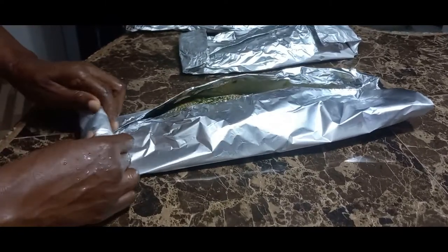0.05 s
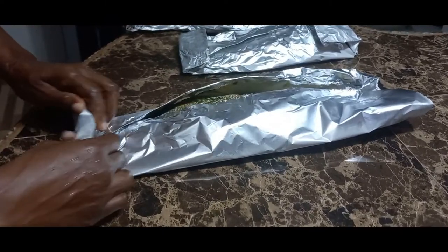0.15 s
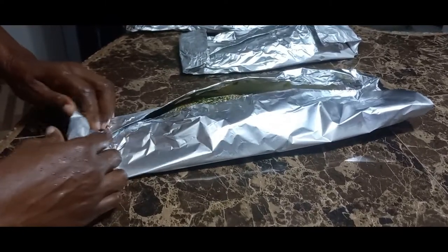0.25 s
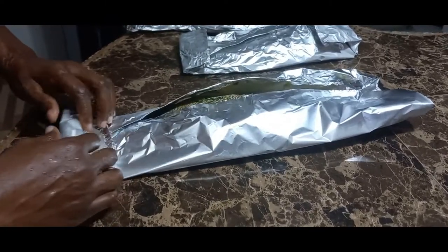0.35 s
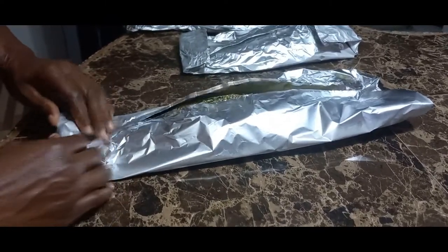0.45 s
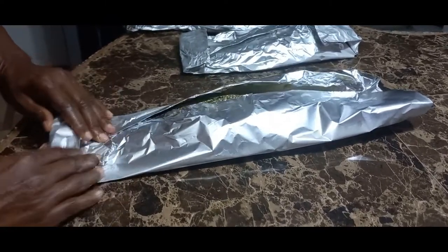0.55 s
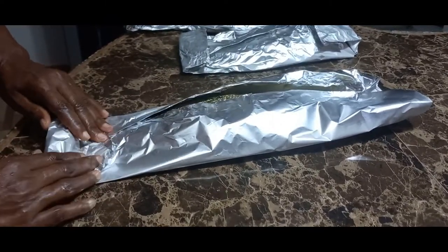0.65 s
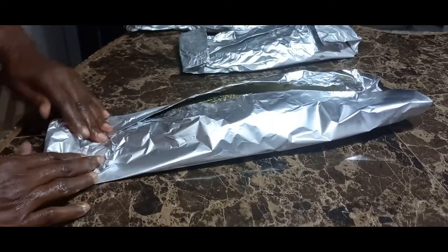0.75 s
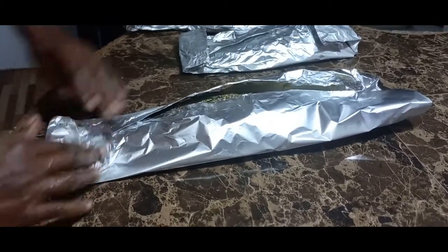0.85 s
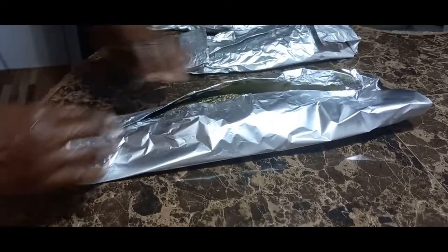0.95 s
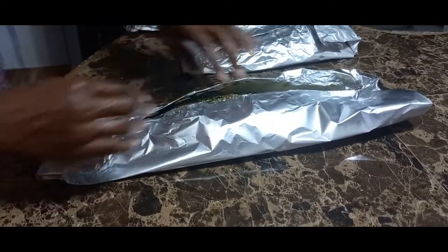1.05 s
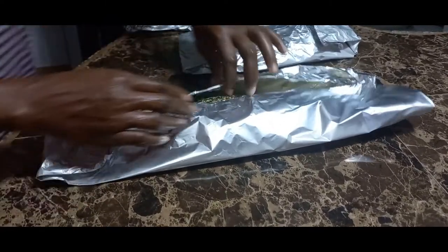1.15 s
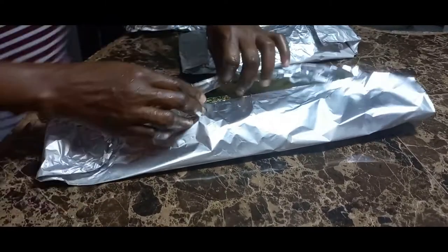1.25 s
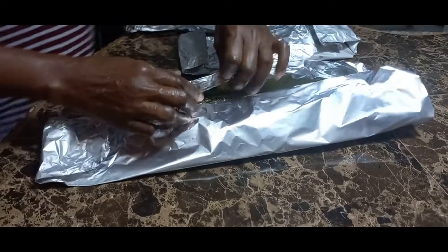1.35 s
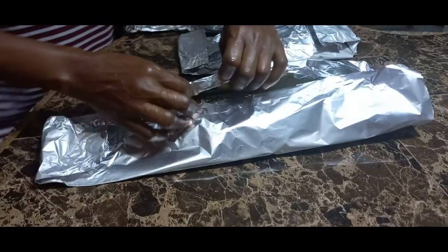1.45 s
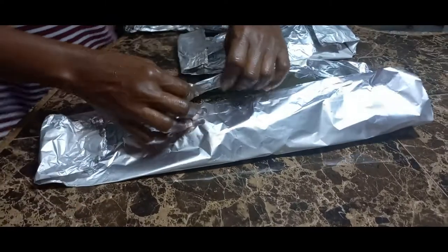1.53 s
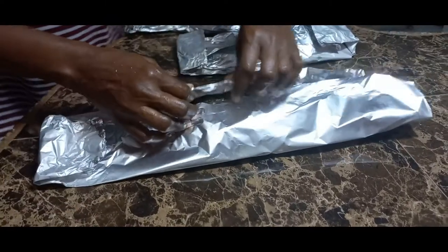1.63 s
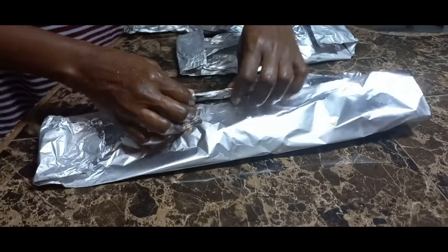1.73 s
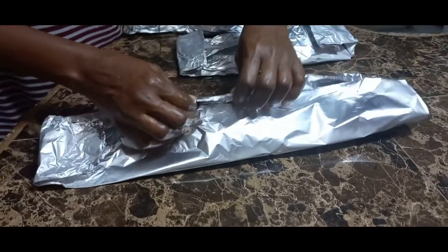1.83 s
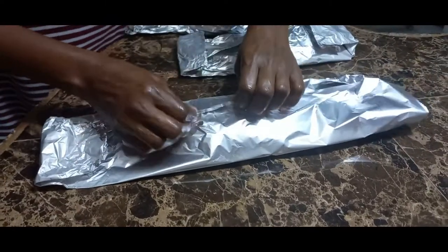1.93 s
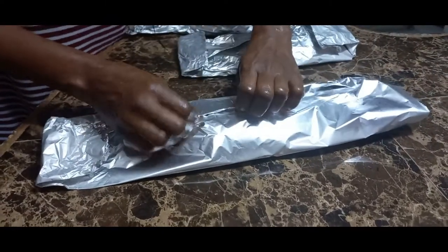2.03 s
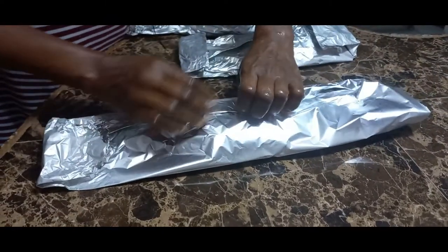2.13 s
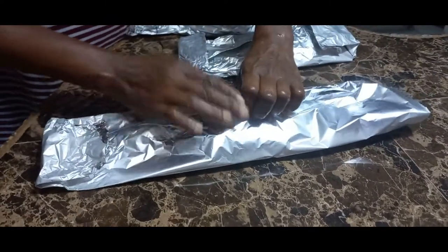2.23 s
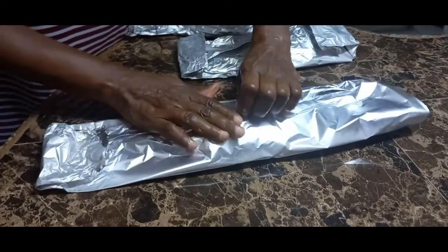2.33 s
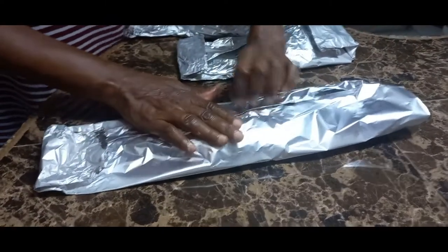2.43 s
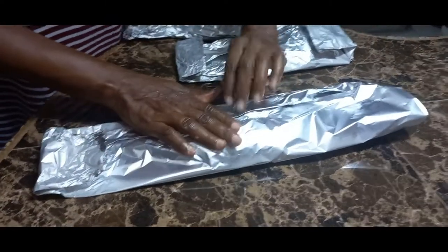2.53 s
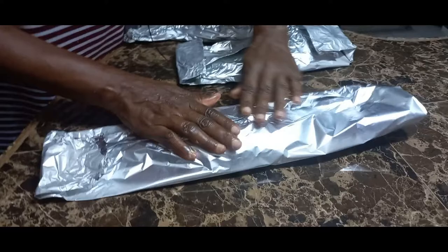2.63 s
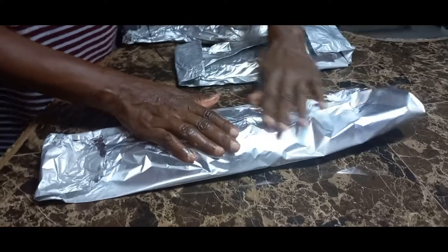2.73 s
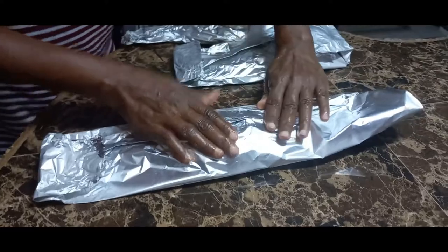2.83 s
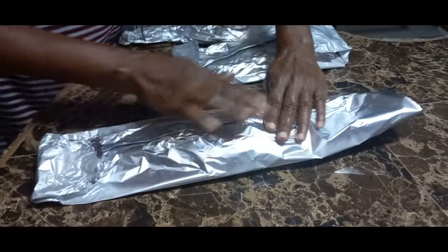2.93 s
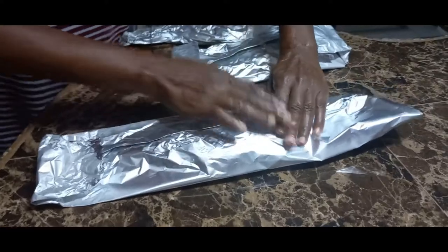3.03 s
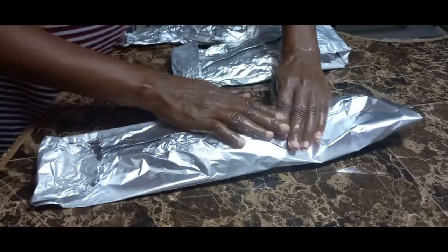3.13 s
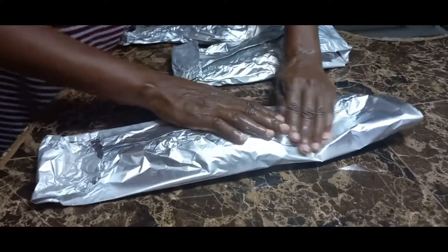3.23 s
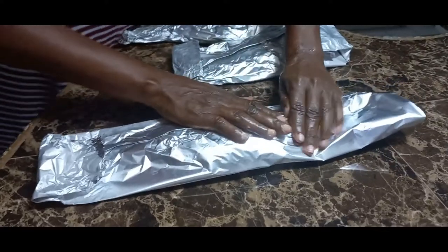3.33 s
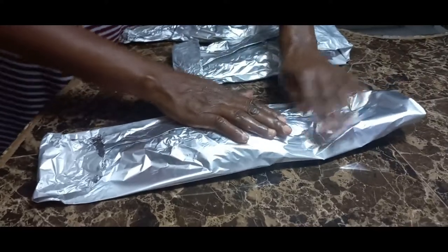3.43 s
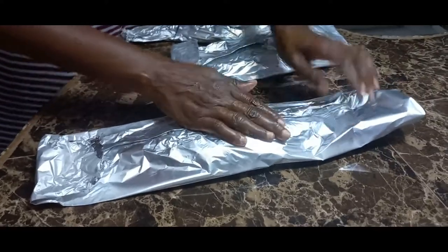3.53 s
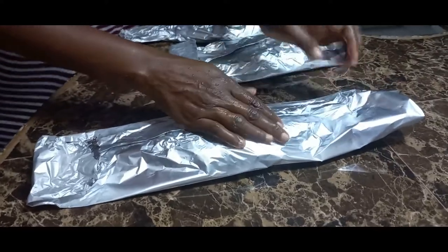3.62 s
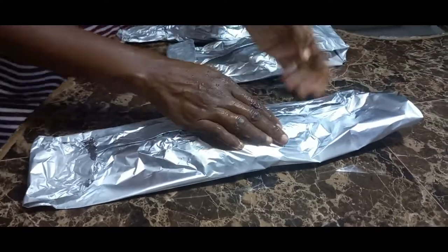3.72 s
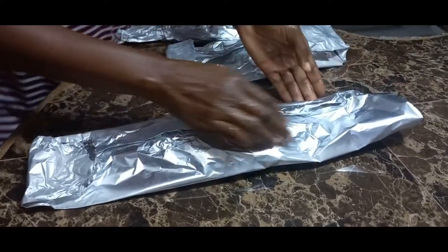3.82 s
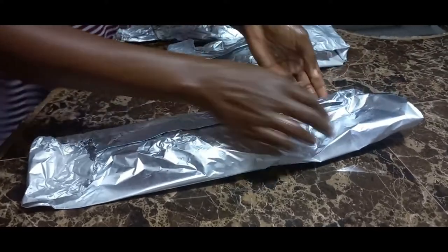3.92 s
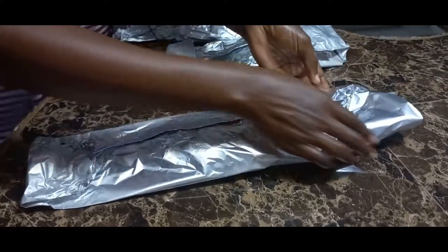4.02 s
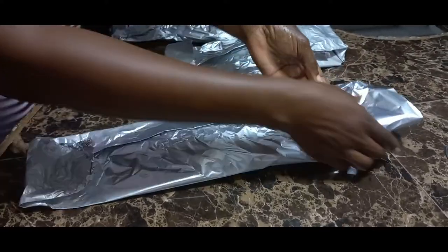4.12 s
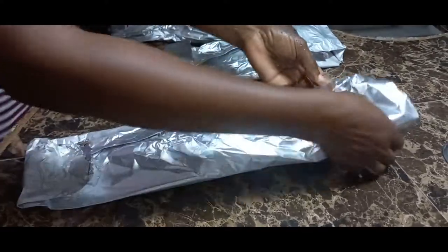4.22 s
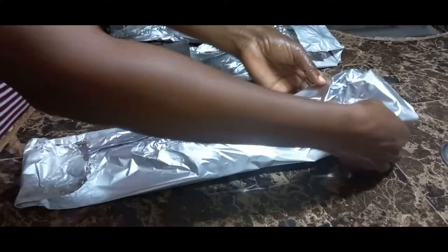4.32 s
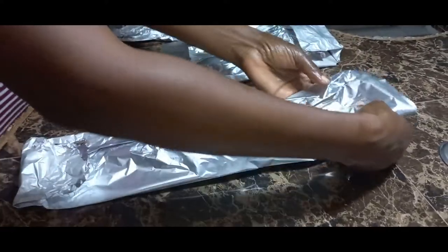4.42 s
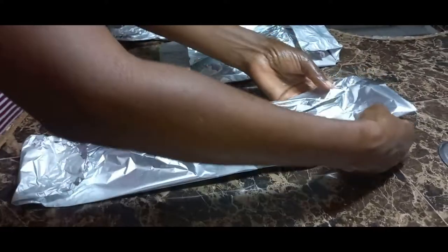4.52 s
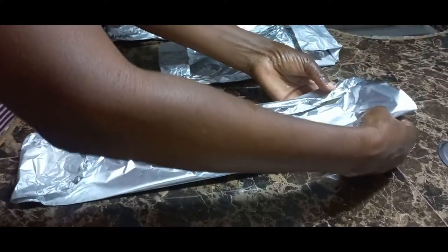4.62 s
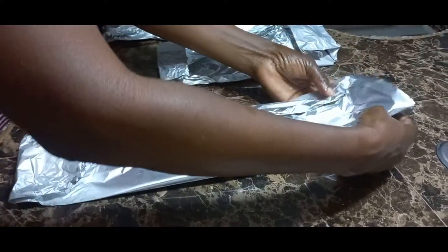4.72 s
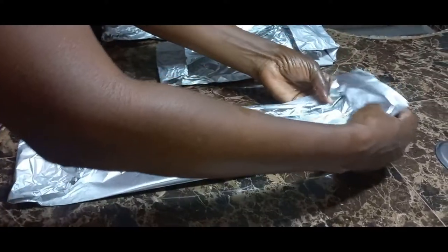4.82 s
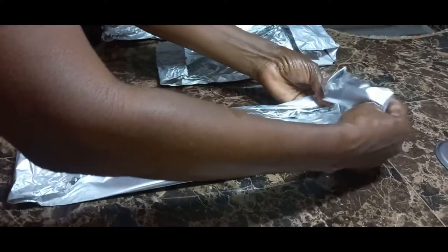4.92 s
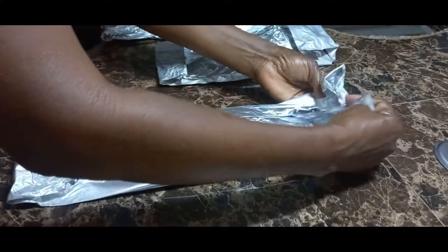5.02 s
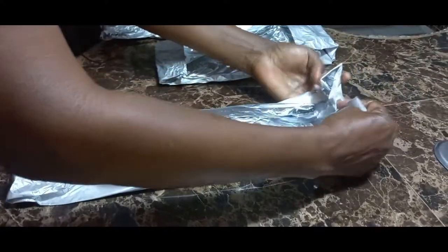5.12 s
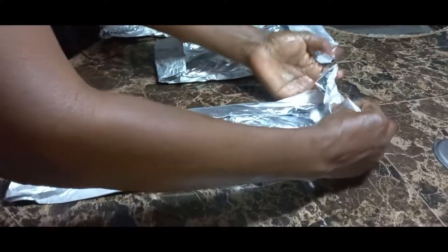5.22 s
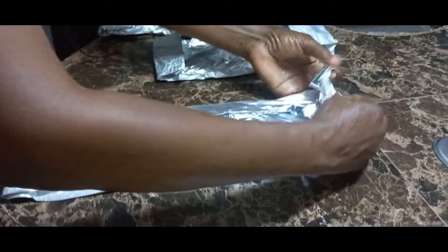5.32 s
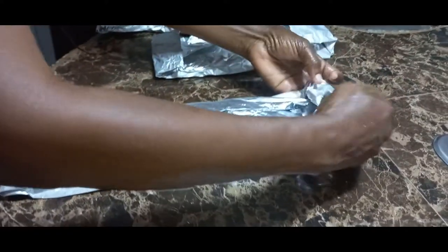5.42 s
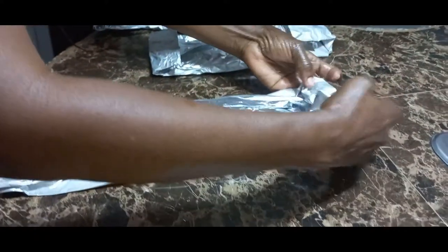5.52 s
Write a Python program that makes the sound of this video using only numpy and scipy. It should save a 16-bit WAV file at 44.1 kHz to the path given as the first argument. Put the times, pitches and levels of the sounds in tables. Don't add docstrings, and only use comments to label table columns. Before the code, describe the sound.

Aluminium foil crackles and crinkles close up as hands fold, crimp and press it on a stone counter, with a faint hum behind.

```python
import sys
import numpy as np
from scipy import signal
from scipy.fft import rfft, irfft, next_fast_len
from scipy.io import wavfile
from scipy.ndimage import uniform_filter1d

SR = 44100
rng = np.random.default_rng(int(sys.argv[2]) if len(sys.argv) > 2 else 0)


def gain_from_db(level_db):
    decades = np.asarray(level_db, float) / 20
    return 10 ** decades


def bounce(signal):
    frames = np.transpose(np.atleast_2d(signal))
    limited = np.clip(frames, -1, 1)
    pcm = np.round(limited * 32767).astype(np.int16)
    wavfile.write(sys.argv[1], SR, pcm)


N = 245195

# start in seconds, length in seconds, top effort in dB,
# swell over the stroke in dB, wide panels in dB re fine creases.
FOLD_STROKES = [
    (-0.01, 0.063, -40, -19, -9.5),
    (-0.01, 0.25, -57.0, -3.7, -23),
    (0.13, 0.098, -64.4, 4, -24.6),
    (0.245, 0.45, -49.2, 15, -17.4),
    (0.35, 0.06, -52, -10, -28.3),
    (0.5, 0.35, -56.5, -16.5, -14),
    (0.6, 0.06, -51.8, 13.0, -22),
    (0.8, 0.06, -75.2, -13.3, -12.6),
    (0.849, 0.13, -55.5, 18, -24.0),
    (0.877, 0.077, -60.5, -9, -15),
]
CRIMP_STROKES = [
    (1.18, 0.32, -45.5, 9, -7),
    (1.28, 0.13, -46.1, 8, -7),
    (1.53, 0.41, -45.5, 14, -14.1),
    (1.54, 0.2, -45.7, -14, -8.1),
    (1.88, 0.06, -41.5, -6.1, -15),
    (1.96, 0.22, -46.0, -5.0, -15.0),
    (2.11, 0.35, -56.5, 11, -11.6),
]
PRESS_STROKES = [(2.26, 0.091, -53, 5, -18), (2.29, 0.059, -38, 20, -14.5),
                 (2.38, 0.18, -43.5, -18.5, -14.8), (2.49, 0.046, -53.3, 1, -19),
                 (2.56, 0.13, -58.5, 4, -27), (2.61, 0.25, -54.7, 3.5, -17.5), (2.76, 0.18, -54, -6.5, -13),
                 (2.79, 0.13, -42.5, -8.5, -10), (2.82, 0.4, -47.5, 17, -8), (3.01, 0.25, -51, -6.7, -13.5),
                 (3.08, 0.085, -55.5, 1, -7.5), (3.26, 0.05, -46.5, -0.1, -3.5),
                 (3.28, 0.43, -49, -16, -11), (3.47, 0.063, -48.5, 17.5, -6), (3.77, 0.09, -65.6, 17, -19)]
ROLL_STROKES = [(3.89, 0.084, -55, -15, -27), (3.93, 0.45, -44.5, 18.8, -14.5),
                (4.01, 0.095, -44.5, -11, -10.5), (4.21, 0.095, -43.5, 6.2, -9),
                (4.36, 0.18, -37.5, 18, -13.2), (4.49, 0.45, -42.5, 7.9, -13),
                (4.56, 0.04, -49, 0.3, -23.2), (4.75, 0.099, -42, 2, -12.5),
                (4.95, 0.093, -41.5, -1.5, -12.5), (5.07, 0.45, -49.5, -5, -10.5),
                (5.14, 0.022, -48.5, 2, -9.5), (5.23, 0.056, -46.5, -16, -7), (5.4, 0.097, -48, -13, -8),
                (5.45, 0.26, -41, -13.4, -8.5)]
# time in seconds, length in seconds, change of the swarm in dB.
PAUSES = [(0.282, 0.03, -7.7), (0.318, 0.04, -7), (0.336, 0.012, -6), (0.479, 0.023, -7), (0.529, 0.028, 5),
          (0.608, 0.015, -4.0), (0.691, 0.015, -7), (0.74, 0.03, -2.9), (1.242, 0.027, -3.5),
          (1.467, 0.05, -8), (1.602, 0.018, -7), (1.628, 0.025, -6.5), (1.72, 0.03, -3),
          (1.746, 0.038, -8.9), (1.851, 0.02, -6), (1.869, 0.012, -4.0), (2.23, 0.033, -2),
          (2.46, 0.03, -4.6), (2.616, 0.01, -5), (2.671, 0.03, 7.5), (2.734, 0.025, -8), (2.99, 0.023, -3),
          (3.085, 0.015, -3), (3.21, 0.03, -5.0), (3.601, 0.034, 5.9), (3.782, 0.03, 5),
          (3.88, 0.012, -4.0), (3.96, 0.03, 6), (3.99, 0.03, -4.6), (4.12, 0.02, -6), (4.198, 0.02, -6.4),
          (4.41, 0.03, -3.0), (4.69, 0.039, -6.5), (5.08, 0.021, -3), (5.28, 0.03, -4.5), (5.287, 0.01, -5)]
# time in seconds, peak in dB, top fizz in dB re peak.
FOLD_CRACKS = [(0.0316, -36.8, -16.5), (0.1356, -42, -11.5), (0.1645, -43.5, -19.1), (0.2957, -41.7, -15.0),
               (0.3461, -41, -11), (0.3581, -36.5, -11.7), (0.4199, -41.1, -14.5), (0.4534, -41.0, -12.8),
               (0.5072, -40.7, -11.3), (0.6155, -33.5, -23.1), (0.6479, -39.1, -12.1),
               (0.6584, -35.2, -18.6), (0.6999, -33.5, -11), (0.8764, -43.5, -13), (0.9053, -43.5, -22.2),
               (0.928, -50.0, -6.5), (0.9572, -38.5, -9)]
CRIMP_CRACKS = [(1.1887, -43, -14), (1.3924, -38.5, -12.5), (1.422, -35.5, -11), (1.495, -39.8, -10.1),
                (1.5694, -34, -13.7), (1.6129, -34.5, -13), (1.6482, -45, -2.1), (1.6744, -38.5, -10.6),
                (1.7015, -35, -12.0), (1.7704, -37.7, -9), (1.7848, -33, -13), (1.8564, -36.9, -11),
                (1.8786, -31, -10), (1.917, -26.5, -15), (1.9854, -40, -7.9), (2.0083, -36, -15.5),
                (2.1041, -40, -5)]
PRESS_CRACKS = [(2.2672, -47.5, 6), (2.2964, -37.6, -17), (2.3341, -25, -15), (2.5038, -33.6, -8.5),
                (2.5401, -37.5, -6.5), (2.6232, -40.5, -11.3), (2.7092, -42.5, -8.9), (2.7966, -32, -20),
                (2.8494, -34, -18.4), (2.9033, -39.3, -15), (3.0036, -44.9, -10), (3.0235, -32.5, -15.4),
                (3.0934, -32, -21), (3.128, -31, -10.5), (3.1724, -38.9, -12.4), (3.2191, -42, -7.2),
                (3.2245, -39, -6.0), (3.2644, -37, -16.3), (3.355, -39.4, -18.4), (3.449, -44.5, -7),
                (3.6664, -48.0, -5.8), (3.6955, -45.0, -17), (3.728, -50.0, 0.4), (3.8302, -51.5, -11),
                (3.8538, -49.5, -8)]
ROLL_CRACKS = [(3.8891, -42.5, -6.5), (4.0183, -38, -20.1), (4.0644, -39, -13.8), (4.1375, -37, -15.0),
               (4.2188, -35.5, -14.2), (4.2887, -38, -9), (4.3685, -37, -13), (4.4593, -34, -13),
               (4.4874, -34, -15.5), (4.4984, -28.7, -16), (4.6524, -35.5, -20), (4.7072, -37, -12.6),
               (4.8252, -31, -9.2), (5.1479, -35, -9.8), (5.2322, -38.5, -11.8), (5.2936, -32, -12.7),
               (5.3946, -38.5, -11), (5.452, -35.2, -11.3), (5.4994, -35, -15.9)]
# time in seconds, peak in dB, pitch in Hz, ring T60 in seconds.
PINGS = [(0.2977, -42.5, 1880, 0.02), (0.3471, -40, 1860, 0.034), (0.4529, -42.5, 1930, 0.035),
         (0.7013, -35, 1827, 0.026), (0.8764, -48, 2060, 0.032), (1.1927, -43, 1730, 0.027),
         (1.5713, -34, 1250, 0.03), (1.7654, -46.5, 1584, 0.048), (1.8836, -28.5, 2080, 0.024),
         (1.9165, -43, 2000, 0.039), (2.0123, -34, 2016, 0.031), (2.3351, -25, 2120, 0.022),
         (2.5047, -32, 1846, 0.031), (2.6484, -39, 1905, 0.035), (2.9103, -31.5, 2223, 0.028),
         (3.2286, -42, 2420, 0.046), (4.0163, -43, 1900, 0.038), (4.1739, -41.5, 1690, 0.032),
         (4.2068, -43, 1820, 0.045), (4.2537, -41, 2020, 0.043), (4.2882, -40, 1860, 0.041),
         (4.4278, -41, 2180, 0.041), (4.4852, -39, 2320, 0.04), (4.5047, -34, 2070, 0.042),
         (4.783, -41, 1920, 0.046), (4.8339, -39, 1800, 0.032), (5.0365, -42, 2100, 0.032),
         (5.2964, -41, 2240, 0.029), (5.3438, -40, 1890, 0.032), (5.4515, -43, 1980, 0.031)]
# time in seconds, peak in dB, pitch in Hz.
MIDDLE_POPS = [(0.1361, -54, 1760), (0.174, -52, 2080), (0.249, -50, 1900), (0.362, -44, 1880),
               (0.381, -45, 1910), (0.414, -50, 2070), (0.5187, -48, 1860), (0.6305, -48, 1860),
               (0.6684, -43, 1860), (0.9043, -52, 2310), (1.266, -52, 1830), (1.3508, -41, 1920),
               (1.3987, -43, 2230), (1.4222, -42, 1910), (1.4611, -39, 2000), (1.498, -46.5, 1980),
               (1.5249, -43, 1950), (1.5713, -40, 2080), (1.6282, -47, 1970), (1.6566, -45, 2010),
               (1.7065, -42, 2020), (1.8073, -45.5, 1910), (1.8567, -46, 1980), (2.1151, -49, 1740),
               (2.3935, -47, 2090), (2.5436, -46, 2230), (2.6264, -48, 1880), (2.6644, -45, 2060),
               (2.7641, -49, 1886), (2.8734, -45, 1760), (3.03, -49, 2120), (3.05, -46, 2040),
               (3.0944, -42, 2020), (3.1527, -42, 2100), (3.2665, -42, 1820), (3.2844, -43, 2200),
               (3.3044, -44, 2190), (3.3583, -46, 1920), (3.4535, -50, 1860), (3.484, -50, 2060),
               (3.5249, -47, 2030), (3.9764, -50, 1980), (4.0487, -45, 1950), (4.136, -49, 2350),
               (4.2198, -43, 1860), (4.2694, -41, 1990), (4.3094, -44, 1860), (4.357, -43, 1750),
               (4.6543, -47, 1610), (4.7072, -48, 1860), (4.7616, -41, 2160), (4.8778, -41, 1880),
               (4.9576, -42, 1990), (5.1337, -46, 1920), (5.244, -46, 2030), (5.3931, -47, 2050),
               (5.4276, -43, 2010), (5.5094, -46, 2010)]
# time in seconds, peak in dB, pitch in Hz.
PANEL_POPS = [(1.189, -52, 1250), (1.283, -51, 1260), (1.331, -48, 1136), (1.503, -50, 1300),
              (1.584, -53, 1030), (1.834, -49, 1270), (1.881, -52, 830), (2.329, -50, 1275),
              (2.8, -48, 1220), (3.113, -52, 1190), (3.234, -53, 1140), (3.525, -53, 1030),
              (3.97, -55, 1200), (4.019, -45, 1290), (4.06, -50, 1200), (4.286, -46, 1144),
              (4.373, -49, 1110), (4.499, -42, 1294), (4.54, -47, 1370), (4.784, -46, 1270),
              (5.031, -49, 1130), (5.226, -49, 1150), (5.46, -46, 1055), (5.507, -46, 1260)]
# time in seconds, peak in dB, pitch in Hz.
LOW_POPS = [(1.189, -58, 756), (1.237, -60, 945), (1.295, -57, 754), (1.333, -55, 942), (1.364, -57, 883),
            (1.409, -62, 941), (1.57, -53, 940), (1.584, -49, 786), (1.701, -65, 860), (1.88, -54, 821),
            (1.929, -51, 850), (3.276, -57, 910), (3.293, -54, 920), (4.252, -53, 834), (4.509, -54, 732),
            (4.879, -50, 925)]
# time in seconds, peak in dB, centre of the pitch region in Hz.
FLICKS = [(0.0864, -43, 6230), (0.1655, -41, 6900), (0.2234, -46, 3700), (0.2492, -46, 4500),
          (0.3764, -43, 4490), (0.4848, -43, 4880), (0.5154, -38, 11300), (0.5764, -41, 5830),
          (0.6304, -36, 11800), (0.6743, -36, 4080), (1.2664, -43, 12900), (1.2914, -40, 3990),
          (1.3514, -36, 5800), (1.3784, -39, 5780), (1.434, -38, 11000), (1.4424, -35, 4390),
          (1.521, -39, 12500), (1.6587, -37, 5220), (1.747, -36, 4060), (1.8354, -34, 11500),
          (1.9434, -31, 5780), (2.0537, -35, 12300), (2.0747, -35, 5810), (2.1184, -37, 5650),
          (2.1774, -40, 12700), (2.6654, -44, 7660), (2.7462, -45, 5600), (2.7644, -44, 5870),
          (2.7742, -36, 3630), (2.806, -33, 11800), (3.076, -40, 3000), (3.112, -41, 4800),
          (3.3947, -39.5, 3810), (3.4311, -41, 12000), (3.4924, -45, 4020), (3.5194, -42, 5890),
          (3.9604, -47, 5420), (4.2114, -37, 5840), (4.7554, -31, 11800), (4.7844, -30.5, 4500),
          (4.962, -36, 3900), (4.975, -35, 3500), (5.0384, -33, 4420), (5.165, -33, 4300),
          (5.3727, -39, 4230), (5.4578, -29, 3820)]
# time in seconds, length in seconds, pitch in Hz, width in Hz, level in dB.
SETTLING = [
    (0.8, 0.06, 2120, 300, -70.5),
    (1.085, 0.074, 2080, 200, -88),
    (1.105, 0.097, 9200, 398, -80),
    (3.678, 0.075, 2060, 350, -70),
    (3.798, 0.27, 2000, 350, -71.5),
    (0.14, 0.12, 1930, 350, -66),
]
# frequency in Hz, spectrum level in dB.
FOIL_COLOUR = [(250, -35), (420, -22), (726, -7), (1160, -1.5), (1460, -5), (1950, 2.5), (2810, -7),
               (3300, -3), (4240, -1.5), (4710, -4.5), (5830, -3.5), (10200, -9.5), (12500, -1.5),
               (15900, -9.5)]
# frequency in Hz, spectrum level in dB.
COUNTER_COLOUR = [(30, -37), (48, 6), (100, 1), (200, 6.5), (320, 5), (450, -39)]
# time in seconds, left-right level difference in dB.
HAND_BALANCE = [
    (0.0, -1.0),
    (0.26, -3.5),
    (1.22, -1),
    (1.61, -3.5),
    (1.86, -2),
    (3.19, -3),
    (3.47, -2),
    (3.73, -5.5),
    (4.07, -2.5),
    (5.56, -1.5),
]
# time in seconds, lag of the left port in samples.
LEFT_LAG = [
    (0.0, -7),
    (2.2, -6),
    (2.7, 1),
    (5.56, 2),
]
# frequency in Hz, T60 in seconds.
ROOM_T60 = [(500, 0.14), (1320, 0.11), (2000, 0.22), (2900, 0.18), (4200, 0.25), (9190, 0.18)]
# frequency in Hz, spectrum level in dB.
AIR_COLOUR = [(26, -38), (45, -5), (207, 0), (321, -7.5), (363, -7.5), (552, -7.5), (609, -10.5),
              (1150, -27), (2130, -31), (3660, -43), (9090, -14.5), (16000, -41)]
# centre in Hz, width in Hz, level in dB.
HUM_BANDS = [
    (104, 33, -83.5),
    (253, 18, -91),
]
# frequency in Hz, left-right likeness from -1 to 1.
PORT_LIKENESS = [(60, 0.65), (130, 0.72), (290, 0.78), (640, 0.77), (1410, 0.32), (3100, 0.13),
                 (6820, -0.25), (15000, 0.13)]
# frequency in Hz, left-right level difference in dB.
PORT_BALANCE = [(60, 6.5), (110, 3), (200, -1), (380, 1.5), (700, -1.5), (1290, -1), (2380, -1.5),
                (4400, 3.5), (8120, 1), (15000, -1.5)]


def crinkle(snaps_per_s=2400, spread_db=3.0, clump_db=1.75, clumps_per_s=30, level_db=-0.74):
    snaps = gain_from_db(spread_db * np.minimum(rng.exponential(1, N), 2.3))
    snaps = snaps * (rng.random(N) < snaps_per_s / SR) * rng.choice([-1, 1], N)
    snaps = snaps * gain_from_db(clump_db * drift(clumps_per_s))
    creases = 24
    crease = rng.integers(0, creases, N)
    t60 = np.geomspace(.006, .03, num=creases)
    shapes = irfft(rings(t60, rise=0.00014, patch_db=5.5, snap_db=-0.5))[..., :1024]
    shapes = shapes / np.linalg.norm(shapes, axis=(0, 2), keepdims=True)
    swarm = np.zeros((2, N))
    for k in range(creases):
        own_snaps = (snaps * (crease == k))[None]
        swarm += signal.oaconvolve(own_snaps, shapes[:, k], axes=1)[:, :N]

    size = next_fast_len(N)
    hz = np.fft.rfftfreq(size, 1 / SR)
    spectrum = rfft(patchy(swarm, depth_db=1.5), size)
    wide, middle, fine, top = (evened(irfft(spectrum * s, size)[:, :N]) for s in fold_sizes(hz))

    effort_db, middle_db, wide_db, top_db = grip()
    hollow = np.exp(-((hz - 3000) / 510) ** 2)
    full_db, gone_db = -71, -55.5
    light = np.clip((effort_db - gone_db) / (full_db - gone_db), 0, .55)
    middle = middle - light * irfft(rfft(middle, size) * hollow, size)[:, :N]
    fine = fine - light * irfft(rfft(fine, size) * hollow, size)[:, :N]

    surge_db = surges()
    wide_db = wide_db + 0.73 * surge_db
    mixed = gain_from_db(wide_db) * wide + gain_from_db(middle_db) * middle + fine + gain_from_db(top_db) * top
    return gain_from_db(level_db + effort_db + surge_db) * mixed


def grip():
    attack_s, release_db_per_s, still_db = 0.0058, 327, -83.5
    t = np.arange(0, N, 64) / SR
    strokes = FOLD_STROKES + CRIMP_STROKES + PRESS_STROKES + ROLL_STROKES
    start, length, top_effort_db, swell_db, panels_db = np.transpose(strokes)[..., None]
    db = top_effort_db + swell_db * np.clip((t - start) / length, 0, 1) - np.maximum(swell_db, 0)
    db = db - release_db_per_s * np.maximum(t - start - length, 0)
    attack = np.clip((t - start) / attack_s, 0, 1)
    power = (gain_from_db(db) * attack) ** 2 + gain_from_db(still_db) ** 2 / len(start)
    effort_db = 10 * np.log10(power.sum(0))
    wide_db = 10 * np.log10((power * gain_from_db(panels_db) ** 2).sum(0)) - effort_db

    lean = effort_db + 55
    middle_db = -8.0 - 0.14 * lean
    wide_db = wide_db + .25 * np.minimum(lean, 0)
    top_db = -1.5 - .05 * lean
    return [np.interp(np.arange(N) / SR, t, x) for x in (effort_db, middle_db, wide_db, top_db)]


def surges():
    t = np.arange(0, N, 64) / SR
    db = sum(gain_db * np.exp(-(2.6 * (t - s) / length) ** 2) for s, length, gain_db in PAUSES)
    return np.interp(np.arange(N) / SR, t, db)


def fold_sizes(hz):
    above = [1 / (1 + (edge / (hz + 1)) ** 12) for edge in (1500, 2700, 9000)]
    shares = [1 - above[0], above[0] - above[1], above[1] - above[2], above[2]]
    return np.sqrt(np.clip(shares, 0, 1)) * gain_from_db(read(FOIL_COLOUR, hz))


def rings(t60, rise, patch_db, snap_db, size=1024):
    t, hz = np.arange(size) / SR, np.fft.rfftfreq(2 * size, 1 / SR)
    draws = rng.standard_normal((len(t60), 2 * size + 1))
    fade = gain_from_db(-60 * t / np.clip(t60, .002, .1)[:, None])
    fade = fade * (1 - np.exp(-t / np.clip(rise, 1e-5, .01)))
    fade = fade + gain_from_db(snap_db - 60 * t / 0.0021)
    a = rfft(draws[:, :size] * fade, 2 * size)
    b = rfft(draws[:, size:2 * size] * fade, 2 * size)
    octaves = np.log2((hz + 1) / 4000) - 1.2 * draws[:, -1:]
    return paired(a, b, hz) * gain_from_db(patch_db * (np.exp(-(octaves / 0.46) ** 2) - 0.8))


def patchy(x, depth_db):
    z = signal.stft(x, nperseg=256)[2]
    field = uniform_filter1d(rng.standard_normal(z.shape[1:]), size=4, axis=0)
    field = uniform_filter1d(field, size=9, axis=1)
    return signal.istft(z * gain_from_db(depth_db * evened(field)), nperseg=256)[1][:, :N]


def cracks(level_db=3.0, middle_db=-15.0, wide_db=-10.5):
    s, peak_db, top_db = np.transpose(FOLD_CRACKS + CRIMP_CRACKS + PRESS_CRACKS + ROLL_CRACKS)
    t60 = (.017 + .0003 * (peak_db + 34.5)) * np.exp(0.16 * rng.standard_normal(len(s)))
    sizes = fold_sizes(np.fft.rfftfreq(2048, 1 / SR))
    sizes = sizes / np.sqrt(np.mean(sizes ** 2, 1, keepdims=True))
    panels_db = wide_db + grip()[2][(s * SR).astype(int)]
    weights_db = np.transpose([panels_db, 0 * s + middle_db, 0 * s - 3.0, top_db + 9.0])
    colour = gain_from_db(level_db + peak_db[:, None] + weights_db) @ sizes
    sounds = irfft(rings(t60, rise=0.00072, patch_db=0.5, snap_db=-6.5) * colour)
    return placed(s, np.roll(sounds, 128, -1), lead=128)


def pings(level_db=-2.0, spread=0.04, rise=0.0016):
    rows = PINGS + [(s, db + 3.5, hz, 0.025) for s, db, hz in MIDDLE_POPS]
    rows = rows + [(s, db + 2.5, hz, .035) for s, db, hz in PANEL_POPS + LOW_POPS]
    s, peak_db, hz, t60 = (c[:, None] for c in np.transpose(rows))
    t = np.arange(3000) / SR
    draws = rng.standard_normal((len(s), 3, 3))
    fade = gain_from_db(level_db + peak_db - 60 * t / np.clip(t60, .005, .1)) * (1 - np.exp(-t / rise))
    turns = hz[..., None] * (1 + spread * draws[..., :1]) * t
    sounds = [np.sin(2 * np.pi * (turns + draws[..., port:port + 1])).sum(1) * fade for port in (1, 2)]
    return placed(s[:, 0], np.array(sounds))


def flicks(level_db=-2.5, t60=0.013, octaves=0.52):
    s, peak_db, centre_hz = (c[:, None] for c in np.transpose(FLICKS))
    hz = np.fft.rfftfreq(2048, 1 / SR)
    colour = np.exp(-(np.log2((hz + 1) / centre_hz) / octaves) ** 2)
    colour = colour / np.sqrt(np.mean(colour ** 2, 1, keepdims=True)) * gain_from_db(level_db + peak_db)
    sounds = irfft(rings(t60 + 0 * s[:, 0], rise=0.00048, patch_db=0.0, snap_db=-7.0) * colour)
    return placed(s[:, 0], np.roll(sounds, 128, -1), lead=128)


def settling():
    t = np.arange(N) / SR
    out = np.zeros((2, N))
    for s, length, centre, width, db in SETTLING:
        swell = np.sin(np.pi * np.clip((t - s) / length, 0, 1)) ** .5
        ring = band_noise(lambda hz: 1 / (1 + (2 * (hz - centre) / width) ** 4))
        out += gain_from_db(db) * swell * ring
    return out


def thuds(level_db=-80, follow=0.23):
    effort_db, _, wide_db, _ = grip()
    force_db = uniform_filter1d(effort_db + wide_db + 60, size=3000)
    return gain_from_db(level_db + follow * force_db) * band_noise(lambda hz: gain_from_db(read(COUNTER_COLOUR, hz)))


def kitchen(x, count):
    taps = rng.standard_normal((count, 2, SR // 2)) * (np.arange(SR // 2) > .004 * SR)
    hz, t, z = signal.stft(taps, SR, nperseg=256)
    decay = gain_from_db(-60 * t / np.clip(read(ROOM_T60, hz), .05, 1)[:, None])
    z = paired(z[:, 0], z[:, 1], hz[:, None]) * decay
    tails = signal.istft(z, SR, nperseg=256)[1]
    spot = np.repeat(rng.integers(0, count, N // 128 + 1), 128)[:N]
    size = next_fast_len(N + SR)
    heard = sum(rfft(x.mean(0) * (spot == k), size) * rfft(tails[:, k], size) for k in range(count))
    return irfft(heard, size)[:, :N] / np.linalg.norm(tails[0, 0])


def background():
    hz = np.fft.rfftfreq(N, 1 / SR)
    air = gain_from_db(-79) * evened(gain_from_db(read(AIR_COLOUR, hz)))
    hum = sum(gain_from_db(db) * evened(1 / (1 + (2 * (hz - f) / width) ** 2)) for f, width, db in HUM_BANDS)
    noise = paired(*rfft(rng.standard_normal((2, N))), hz)
    whine_hz = 298.5 + 1.58 * drift(3.1)
    whine = gain_from_db(-81.5 + 2.1 * drift(5.8)) * np.sin(2 * np.pi * np.cumsum(whine_hz) / SR)
    return irfft(noise * np.hypot(air, hum), N) + whine


def band_noise(shape):
    hz = np.fft.rfftfreq(N, 1 / SR)
    return evened(irfft(paired(*rfft(rng.standard_normal((2, N))), hz) * shape(hz), N))


def drift(per_s):
    z = rfft(rng.standard_normal(N)) / (1 + (np.fft.rfftfreq(N, 1 / SR) / per_s) ** 2)
    return evened(irfft(z, N))


def paired(a, b, hz):
    same = np.clip(read(PORT_LIKENESS, hz), 0, 1)
    return np.array([a, same * a + np.sqrt(1 - same ** 2) * b])


def placed(times, sounds, lead=0):
    size = sounds.shape[-1]
    out = np.zeros((2, N + size + lead))
    for k, at in enumerate(np.round(times * SR).astype(int)):
        out[:, at:at + size] += sounds[:, k]
    return out[:, lead:N + lead]


def read(points, hz):
    f, value = np.transpose(points)
    return np.interp(np.log(hz + 1), np.log(f + 1), value)


def evened(x):
    return x / np.sqrt(np.mean(abs(x) ** 2) + 1e-30)


def scene():
    foil = crinkle() + cracks() + pings() + flicks()
    t = np.arange(N) / SR
    side = gain_from_db(np.outer([.5, -.5], np.interp(t, *np.transpose(HAND_BALANCE))))
    lag = np.round(np.interp(t, *np.transpose(LEFT_LAG))).astype(int)
    left = foil[0, np.clip(np.arange(N) - lag, 0, N - 1)]
    direct = gain_from_db(-2.07) * side * np.array([left, foil[1]])
    return direct + gain_from_db(-4.0) * kitchen(foil, count=6) + settling() + thuds() + background()


def low_pass(x):
    return signal.sosfilt(signal.butter(12, 17020, fs=SR, output="sos"), x)


def record(dry):
    size = next_fast_len(N)
    hz = np.fft.rfftfreq(size, 1 / SR)
    colour_db = np.outer([.5, -.5], read(PORT_BALANCE, hz)) - 46 * (hz > 16040)
    mix = irfft(rfft(dry, size) * gain_from_db(colour_db), size)[:, :N]
    return low_pass(mix)


dry = scene()
out = record(dry)
bounce(out)
```